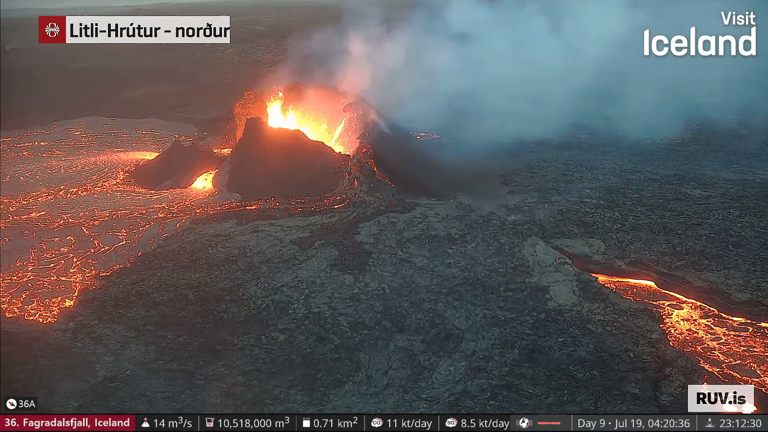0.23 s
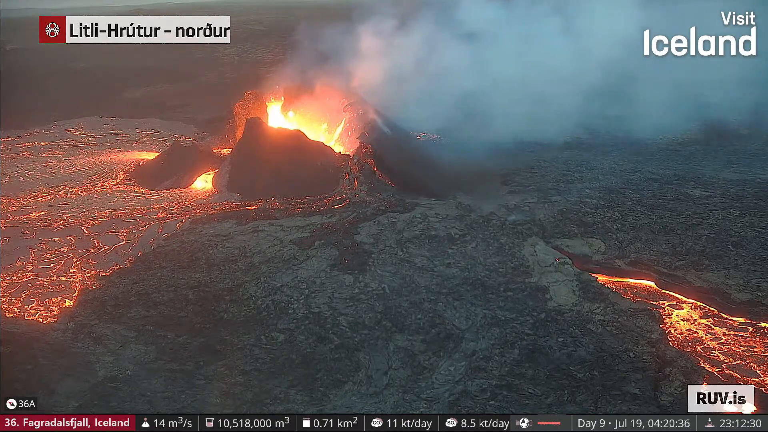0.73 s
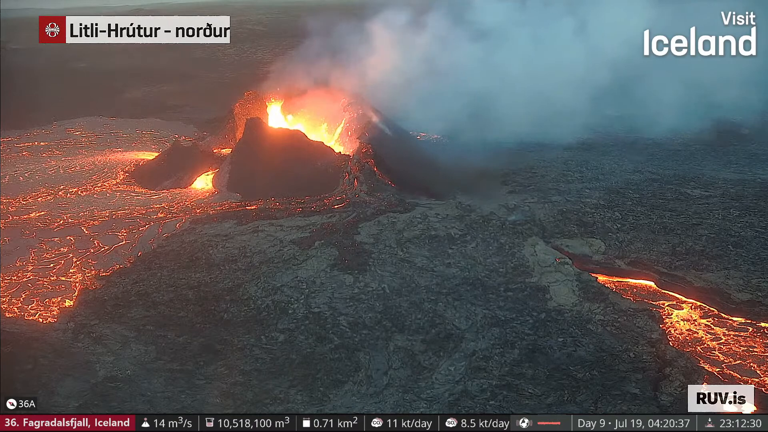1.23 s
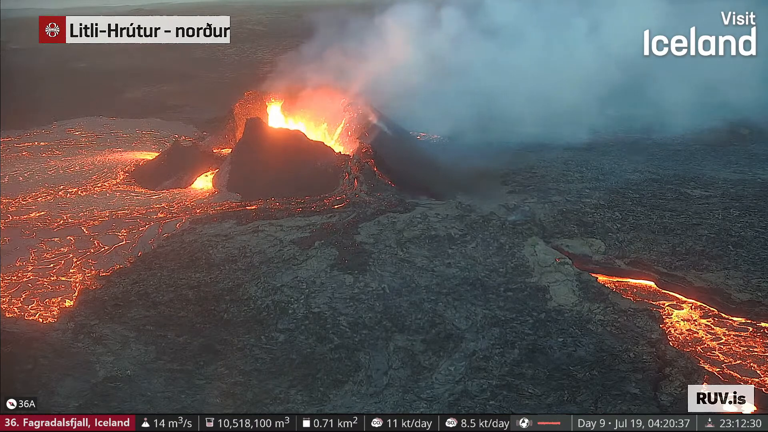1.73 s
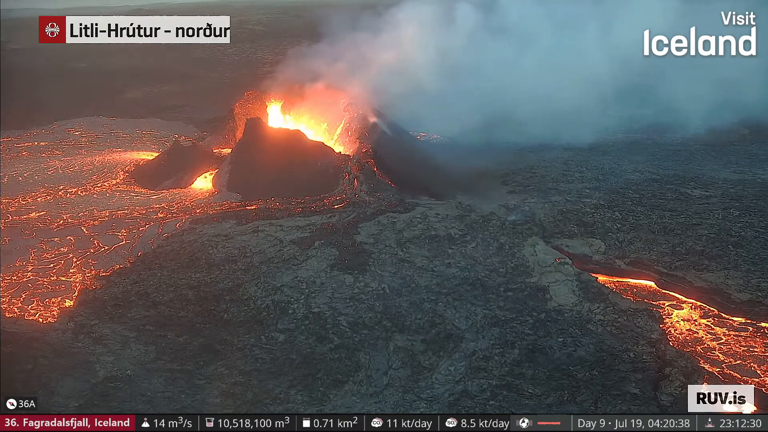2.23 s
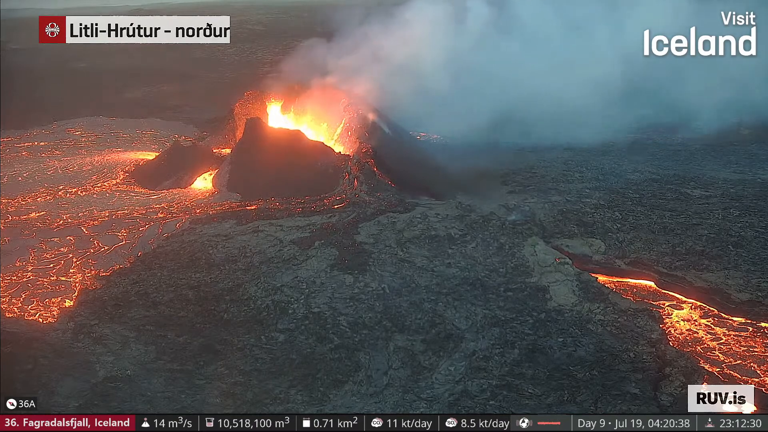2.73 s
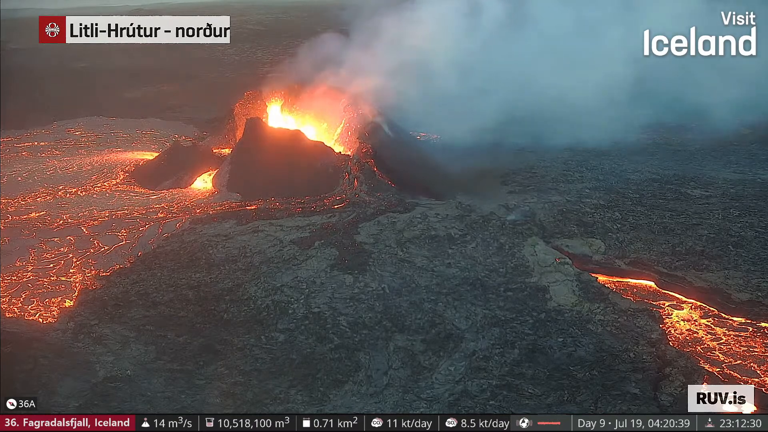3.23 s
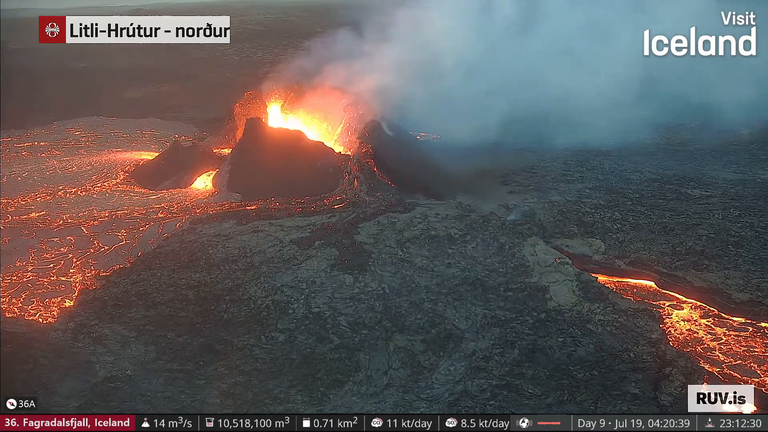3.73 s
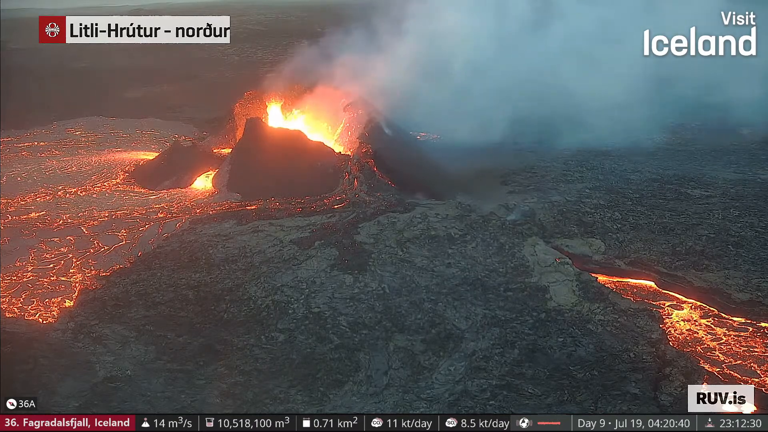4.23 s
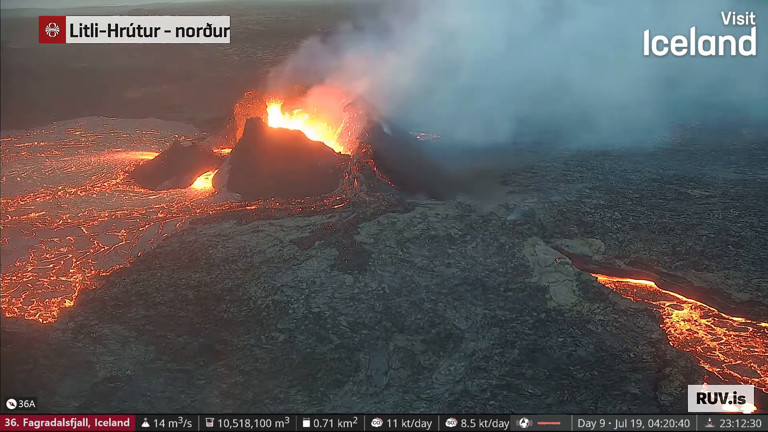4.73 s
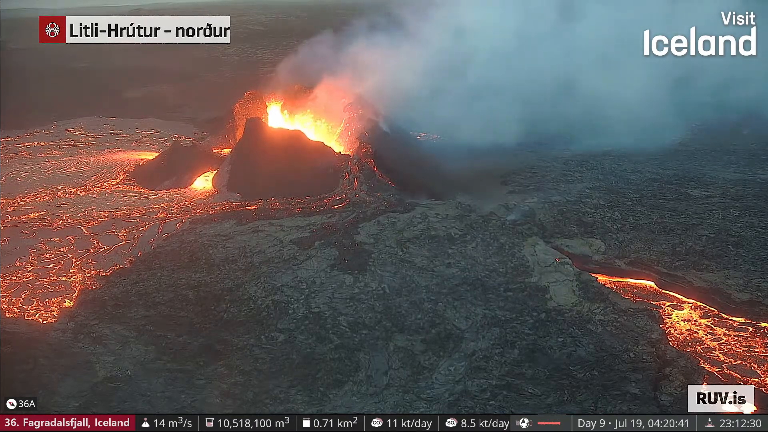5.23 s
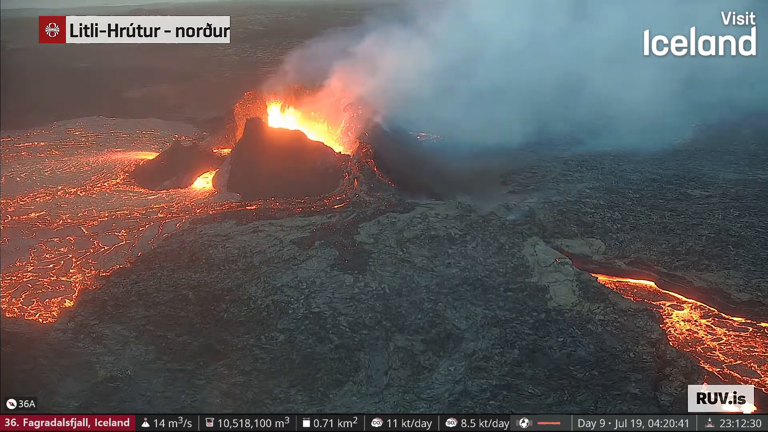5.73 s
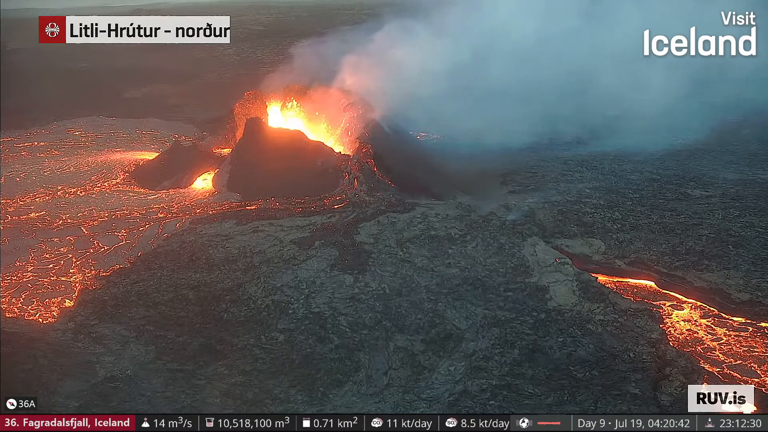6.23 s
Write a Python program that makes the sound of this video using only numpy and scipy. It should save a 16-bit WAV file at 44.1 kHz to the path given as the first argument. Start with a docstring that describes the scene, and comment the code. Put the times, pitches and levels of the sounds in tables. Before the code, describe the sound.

From 0 to about 6.5 seconds, wind blows steadily over an outdoor microphone on an open ridge above an erupting vent. Dense low rumble and soft thumps dominate, heaving quickly, with brief slackening near 1.5, 3.9, 5 and 5.9 seconds. Through it runs a rough, low howl, a blurred humming moan whose pitch constantly wavers; it swells around 0.5 to 1 second, again from 2.6 to 3.3, and more gently near 4, 5.2 and the end. Hollow drones flutter just above it, with quick knocks of wind around 3.8 and 4.5 to 4.7. Far quieter behind, lava makes a dull, churning roar with a thin rasp, surging near 0.2, 0.7, 1.7, 3.5, 4.5 and 5.4, with soft puffs clustered around 2.1. Tiny gritty ticks and faint hiss are almost buried. The sound is dark, continuous and bass-heavy.

```python
"""A ridge above an erupting volcanic vent, where wind buffets an outdoor camera.
Eddies shed by the mast make a rough, low howl: a wavering line, a noisy skirt, an octave and a slower beat.
Low noise thumps the microphone, and two resonant noise bands drone round the housing.
Behind, filtered noise makes a dull roar that surges, sinks and puffs, faint gritty ticks and a thin hiss."""
import sys
import numpy as np
from scipy import signal
from scipy.fft import rfft, irfft, next_fast_len
from scipy.io import wavfile
from scipy.ndimage import uniform_filter1d, minimum_filter1d, map_coordinates

SR = 44100
rng = np.random.default_rng(int(sys.argv[2]) if len(sys.argv) > 2 else 0)


def store_pcm(level_fs):
    """Save levels as 16-bit WAV."""
    pcm = np.round(np.clip(level_fs, -1, 1) * 32767).astype(np.int16)
    wavfile.write(sys.argv[1], SR, np.atleast_2d(pcm).T)


N = 285591

# Noise colours. Each row: frequency in Hz, relative spectral density in dB.
HISS_COLOUR = [(1200, -17.5), (3000, -5), (4100, 5), (5200, -2), (7500, -1), (9000, 2), (10300, 2),
               (11300, -3), (14000, -7.5)]
GRIT_COLOUR = [(1500, -26.5), (2000, 0), (2350, 5.5), (2700, -6.5), (3200, -16.5), (3900, -3), (4300, 1),
               (5100, -10.5), (6500, -17), (10000, -33)]
SCUFF_COLOUR = [(500, -15.5), (1200, 9.5), (2300, -4.5), (3300, -24.5), (8000, -52.5)]
SPARK_COLOUR = [(3500, -27.5), (5600, -2.5), (10000, -1), (14000, -14)]
PUFF_COLOUR = [(200, -14.5), (450, 10), (700, 7.5), (1000, -11.5), (1700, -23), (3000, -40), (8000, -74.5)]
SPLASH_COLOUR = [(500, -6.5), (950, 10), (1500, -6.5), (2200, -18), (3200, -25), (8000, -50.5)]
ROAR_COLOUR = [(250, -16.5), (600, 4.5), (800, -2), (1050, -6), (1500, -17), (1900, -22), (3000, -43),
               (6000, -78)]
RASP_COLOUR = [(700, -15), (1100, 3.5), (1500, 5.5), (1900, -1.5), (2350, -2), (3000, -9), (4200, -14.5),
               (5200, -16.5), (9000, -29)]
BUFFET_COLOUR = [(3, -21.5), (10, -1), (40, -1), (70, -3), (120, -3.5), (190, -7.5), (260, -19.5),
                 (500, -49), (1000, -100)]
LOW_HOUSING_COLOUR = [(120, -25.5), (205, 4), (250, 0), (295, -1.5), (340, -10.5), (450, -28.5), (900, -71)]
HIGH_HOUSING_COLOUR = [(200, -25.5), (300, -1.5), (360, 1), (465, -4), (550, -13.5), (750, -26.5),
                       (1200, -42), (3000, -100)]

# Swells of the hiss. Each row: centre in seconds, length in seconds, lift in dB.
HISS_SWELLS = [(0.62, 0.37, 4), (1.2, .4, 2), (4.05, 0.99, 1), (6.14, 0.2, 2.5)]
HISS_DB = -71  # before the swells

# Gritty ticks. Each row: start in seconds, rise in seconds, then grit, dull scuff and bright spark in dB.
TICKS = [(0.174, 0.0055, -65, -57, -74.5), (0.872, .007, -64, -55.5, -71), (1.119, 0.0035, -62.5, -53, -69),
         (1.326, .006, -69, -50.5, -73), (1.5413, 0.0015, -58.5, -55, -67.5),
         (1.921, 0.0025, -61, -66, -76), (3.046, 0.0035, -61, -70, -77.5), (3.0556, .005, -60, -70, -66),
         (5.125, .004, -64.5, -53.5, -70), (5.4144, .005, -67, -58, -70.5),
         (5.6828, 0.0024, -57.5, -53.5, -63)]

# Puffs in the roar. Each row: start in seconds, rise in seconds, body in dB, splash in dB.
PUFFS = [(0.165, 0.0083, -49, -50), (0.236, 0.0036, -37.5, -59), (0.648, 0.0072, -39.5, -56.5),
         (0.754, 0.0035, -39, -63), (0.946, 0.0046, -59, -55), (1.116, .007, -49, -46),
         (1.35, 0.0071, -47, -50), (1.699, 0.0037, -42, -57), (1.731, 0.0074, -42, -58.5),
         (1.903, 0.0047, -46, -60), (1.962, 0.0099, -44, -60), (2.081, 0.003, -37, -58),
         (2.205, 0.0097, -36, -53.5), (2.904, 0.006, -39.5, -59.5), (3.491, 0.0037, -40.5, -56),
         (3.764, 0.0099, -44, -65), (4.426, 0.0069, -46, -50.5), (4.552, 0.0046, -41, -63),
         (4.676, 0.0054, -42.5, -62), (5.375, 0.0076, -39, -49.5), (5.458, .004, -42, -59),
         (5.715, 0.0049, -47, -62), (5.866, .004, -46, -63.5)]

# Surges of the lava fountain. Each row: crest in seconds, roar in dB, rasp in dB, fall in dB per second.
SURGES = [(0.18, -51, -62.5, 19), (0.66, -52, -70, 10.5), (0.9, -56, -65.5, 13), (1.74, -51.5, -76.5, 6),
          (3.46, -52, -65.5, 8.5), (3.76, -53, -65.5, 36.5), (4.48, -56.5, -63, 8), (4.72, -55, -76, 11),
          (5.36, -55.5, -63, 11)]
SURGE_RISE_S = 0.11
# The vent between surges: starting levels, and how fast both ebb.
ROAR_DB, RASP_DB, EBB_DB_PER_S = -50.5, -60, 1

# Lulls and pushes in the buffeting. Each row: centre in seconds, length in seconds, change in dB.
BUFFET_CHANGES = [(0.45, 0.19, 1.5), (0.75, 0.14, -1.5), (1.04, 0.095, -2.5), (1.5, 0.066, -6),
                  (1.66, .1, -1), (1.96, 0.055, 1), (2.68, 0.12, -2), (2.95, 0.2, 1), (3.3, 0.14, -2.5),
                  (3.92, 0.17, -3.5), (4.54, 0.095, 0), (4.96, 0.19, -6.5), (5.33, .2, -0.5),
                  (5.65, 0.12, -0.5), (5.93, 0.26, -4.5), (6.35, 0.24, -0.5)]
# Usual buffeting level, rms depth of its random heaving, and random turning points per second.
BUFFET_DB, HEAVE_DB, HEAVE_RATE = -23, 0.53, 14

# Housing drone. Each row: time in seconds, lower resonance in dB, upper resonance in dB.
DRONE = [(0.0, -35.5, -35.5), (0.2, -31.5, -35), (0.55, -28, -35), (0.8, -36.5, -33.5), (1.08, -33.5, -31),
         (1.2, -35.5, -37.5), (1.48, -34, -40), (1.95, -37, -38), (2.38, -35.5, -41), (2.55, -34, -35.5),
         (3.1, -33, -35), (3.45, -30, -35.5), (3.8, -33, -36.5), (4.3, -38.5, -35), (4.7, -34.5, -39),
         (5.0, -38.5, -38), (5.2, -40.5, -37), (5.32, -37.5, -35), (5.75, -37, -33), (5.98, -35.5, -36.5),
         (6.2, -36.5, -35), (6.48, -30.5, -33.5)]
# Wind turning round the housing. Each row: time in seconds, upper resonance shift in semitones.
VEER = [(0.0, 0), (0.65, 0.83), (0.95, -1), (1.3, .5), (1.95, 2), (2.5, 1.6), (2.85, 0.14), (3.25, -1),
        (3.7, 0.47), (4.0, -2), (4.25, -2), (4.65, 1), (5.1, -0.5), (5.7, 0.55), (6.0, -1), (6.48, -1.34)]
# Brief eddies that strike the housing. Each row: centre in seconds, length in seconds, drone lift in dB.
EDDIES = [(0.18, 0.081, 4), (0.5, 0.061, 1.5), (3.5, 0.05, 1.5), (3.76, 0.048, 5), (3.89, 0.042, 3.5),
          (4.09, 0.046, 3.5), (4.46, 0.074, 6), (4.7, 0.043, 5), (5.32, 0.05, 4)]

# Eddies shed by the mast, in step with the wind speed. Each row: time in seconds, shedding rate in Hz.
SHEDDING = [(0.0, 154.7), (0.1, 119.3), (0.2, 176.2), (0.4, 155.2), (0.55, 180.6), (0.62, 170.4),
            (0.69, 204.1), (0.8, 188), (0.92, 195.7), (1.02, 193.6), (1.1, 184.3), (1.24, 181.1),
            (1.45, 168), (1.63, 152), (1.73, 191.2), (1.85, 141.8), (1.89, 186), (1.98, 192.4), (2.09, 109),
            (2.31, 160), (2.41, 135), (2.61, 176.4), (2.74, 185), (2.8, 168), (2.88, 180), (3.17, 171.4),
            (3.3, 156), (3.48, 157.4), (3.72, 180), (3.87, 141), (3.99, 181.9), (4.08, 151), (4.2, 173.9),
            (4.3, 145.9), (4.42, 137.9), (4.53, 197.5), (4.6, 167.9), (4.75, 184.4), (4.86, 169.9),
            (4.98, 183.8), (5.08, 160.8), (5.12, 128.2), (5.17, 150), (5.24, 144), (5.37, 182),
            (5.47, 187.6), (5.57, 167), (5.66, 188), (5.75, 165), (5.95, 164), (6.05, 170), (6.35, 139),
            (6.48, 166.8)]
# Gusts in the howl. Each row: centre in seconds, length in seconds, lift (or dip) in dB.
GUSTS = [(0.77, 0.8, 9.5), (1.55, 0.11, 1.5), (1.83, 0.16, 4), (2.12, .14, -2), (2.6, 0.18, 7.5),
         (2.79, 0.25, 8.5), (3.27, 0.3, 9), (4.03, 0.51, 2.5), (5.25, 0.39, 3.5), (6.22, 2.1, 4.5)]
# Howl between gusts: complex level at the mean rate (its real part lies 3 dB lower), and rise with rate.
HOWL_DB, HOWL_DB_PER_OCTAVE = -26.5, 3.5
# Smeared octave: level against the howl, and random wander in knots per second.
OCTAVE_DB, OCTAVE_WANDER_RATE = -23.5, 55
# Thicker part of the mast: rate over the main one, level against the howl, wander in knots per second.
SLOW_RATIO, SLOW_DB, SLOW_WANDER_RATE = 0.77, -11.5, 30

TOP_HZ = 14300  # the camera's band limit


def amp(db):
    """Decibels to gain."""
    return 10 ** (np.asarray(db) / 20)


def unit(x):
    """Scale to rms 1."""
    return x / np.sqrt(np.mean(np.abs(x) ** 2) + 1e-20)


def curves(rows):
    """Draw straight lines between rows: one curve for each column after the time."""
    times, *columns = np.transpose(rows)
    t = np.arange(N) / SR
    return [np.interp(t, times, column) for column in columns]


def wobble(rate):
    """A smooth random curve of rms 1, with rate knots a second."""
    knots = rng.standard_normal(int(N * rate / SR) + 4)
    return unit(map_coordinates(knots, [np.arange(N) * rate / SR]))


def scatter(rate):
    """A random wander of size and phase, rms 1, that smears a line; rate is in knots a second."""
    return unit(wobble(rate) + 1j * wobble(rate))


def swells(rows):
    """Sum bell-shaped rises or dips in dB; length spans the points where the bell falls to 1/e."""
    t = np.arange(N) / SR
    return sum(db * np.exp(-(2 * (t - centre) / length) ** 2) for centre, length, db in rows)


def burst(start, rise):
    """A soft-edged envelope that peaks at 1, rise seconds after its start."""
    u = np.maximum(np.arange(N) / SR - start, 0) / rise
    return u * np.exp(1 - u)


def filtered(x, response):
    """Shape a sound's spectrum by a gain for each frequency."""
    m = next_fast_len(N + SR // 2)  # padding keeps the filter's tail from wrapping round
    hz = np.fft.rfftfreq(m, 1 / SR)
    return irfft(rfft(x, m) * response(hz), m)[:N]


def noise(colour):
    """Random noise of rms 1, coloured along a log-frequency curve."""
    f, db = np.transpose(colour)

    def response(hz):
        return amp(np.interp(np.log(hz + 1), np.log(f), db))

    return unit(filtered(rng.standard_normal(N), response))


def steady(x, seconds):
    """Even out the slow swells of a sound and keep its fast flutter."""
    power = uniform_filter1d(np.abs(x) ** 2, max(int(seconds * SR), 1))
    return x / np.sqrt(np.abs(power) + 1e-12)


def patchy(x, depth_db):
    """Lift and drop neighbouring bands of a noise at random."""
    z = signal.stft(x, nperseg=1024)[2]
    field = rng.standard_normal(z.shape)
    field = uniform_filter1d(field, size=4, axis=0)  # blend across frequency
    field = uniform_filter1d(field, size=5, axis=1)  # blend across time
    lifted = z * amp(depth_db * unit(field))
    return unit(signal.istft(lifted, nperseg=1024)[1][:N])


def shifted(x, semitones):
    """Slide all the frequencies of a noise by reading it at a varying speed."""
    position = np.cumsum(2 ** (semitones / 12))
    return map_coordinates(x, [position], mode="mirror")


def surging(rest_db, surges):
    """Add the power of fast-rising, slow-sinking surges to a slowly ebbing bed, and give the gain."""
    t = np.arange(N) / SR
    power = amp(rest_db - EBB_DB_PER_S * t) ** 2
    for crest, db, fall in surges:
        rise = np.exp(-(np.minimum(t - crest, 0) / SURGE_RISE_S) ** 2)
        sink = amp(db - fall * np.maximum(t - crest, 0))
        power = power + (rise * sink) ** 2
    return np.sqrt(power)


def hiss():
    """A thin hiss, gently uneven noise, lies far under the rumble."""
    air = patchy(noise(HISS_COLOUR), depth_db=1.8)
    level_db = HISS_DB + swells(HISS_SWELLS) + 0.87 * wobble(22)
    return amp(level_db) * air


def ticks():
    """Each tick is a short, grainy spray of noise with its own mix of grit, dull scuff and bright spark."""
    grit = sum(amp(db) * burst(s, rise) for s, rise, db, _, _ in TICKS)
    scuff = sum(amp(db) * burst(s, rise) for s, rise, _, db, _ in TICKS)
    spark = sum(amp(db) * burst(s, rise) for s, rise, _, _, db in TICKS)
    grains = steady(amp(4 * wobble(1000)), seconds=0.004)
    return grains * (grit * noise(GRIT_COLOUR) + scuff * noise(SCUFF_COLOUR) + spark * noise(SPARK_COLOUR))


def puffs():
    """Short bursts in the vent's roar: a dull body of noise with more or less splash on top."""
    body = sum(amp(db) * burst(s, rise) for s, rise, db, _ in PUFFS)
    splash = sum(amp(db) * burst(s, rise) for s, rise, _, db in PUFFS)
    dull = steady(noise(PUFF_COLOUR), seconds=0.0036)
    wet = steady(noise(SPLASH_COLOUR), seconds=0.014)
    return body * dull + splash * wet


def roar():
    """The vent's turbulent roar surges and churns quickly; a thinner rasp rides above it."""
    roar_gain = surging(ROAR_DB, [(s, db, fall) for s, db, _, fall in SURGES])
    rasp_gain = surging(RASP_DB, [(s, db, fall) for s, _, db, fall in SURGES])
    churn = amp(1.1 * wobble(23) + 1.2 * wobble(110))
    bed = steady(churn * patchy(noise(ROAR_COLOUR), depth_db=1.25), seconds=0.21)
    rasp_churn = amp(1.1 * wobble(25) + 1.4 * wobble(140))
    rasp = unit(rasp_churn * noise(RASP_COLOUR))
    return roar_gain * bed + rasp_gain * rasp


def buffeting():
    """Pressure lumps hit the microphone as low, heaving noise."""
    level_db = BUFFET_DB + HEAVE_DB * wobble(HEAVE_RATE) + swells(BUFFET_CHANGES)
    return amp(level_db) * steady(noise(BUFFET_COLOUR), seconds=0.1)


def housing_drone():
    """The flow drones round the housing in two fluttering resonances; the upper slides as the wind turns."""
    low_db, high_db = curves(DRONE)
    semitones, = curves(VEER)
    flutter = amp(1.15 * wobble(45))
    low = patchy(noise(LOW_HOUSING_COLOUR), depth_db=-0.1)
    high = shifted(patchy(noise(HIGH_HOUSING_COLOUR), depth_db=1.5), semitones)
    low_drone = amp(low_db) * steady(flutter * low, seconds=0.18)
    high_drone = amp(high_db) * steady(flutter * high, seconds=0.11)
    return amp(swells(EDDIES)) * (low_drone + high_drone)


def mast_howl(tone_db, skirt_db, skirt_rate, jitter, shimmer_db, tone_tilt):
    """Eddies leave the mast almost regularly: a jittery line within a noisy skirt.

    Their drag adds an octave, and slower eddies beat against them.
    """
    rate, = curves(SHEDDING)
    rate_octaves = np.log2(rate / np.mean(rate))
    level_db = HOWL_DB + HOWL_DB_PER_OCTAVE * rate_octaves + swells(GUSTS)
    phase = 2 * np.pi * np.cumsum(rate * (1 + jitter * wobble(35))) / SR
    tilt_db = tone_tilt * (level_db - np.mean(level_db))  # a fraction of a dB
    tone = amp(tone_db + tilt_db) * unit(amp(shimmer_db * wobble(45)))
    skirt = amp(skirt_db) * scatter(skirt_rate)  # turbulence scatters the eddies
    eddies = steady(tone + skirt, seconds=0.081) * np.exp(1j * phase)
    octave = amp(OCTAVE_DB) * scatter(OCTAVE_WANDER_RATE) * np.exp(2j * phase)
    slow = amp(SLOW_DB) * scatter(SLOW_WANDER_RATE) * np.exp(1j * SLOW_RATIO * phase)
    return amp(level_db) * np.real(eddies + octave + slow)


def scene():
    """All sources meet at one microphone."""
    vent = hiss() + ticks() + puffs() + roar()
    wind = buffeting() + housing_drone()
    howl = mast_howl(tone_db=3, skirt_db=1, skirt_rate=61.94, jitter=0.03, shimmer_db=0.6, tone_tilt=0.027)
    return (vent + wind + howl)[None]


def limiter(x, ceiling_db, hold, knee):
    """Ease the gain down around the tallest peaks, starting gently below the ceiling; hold in seconds."""
    span = max(int(hold * SR), 1)
    needed = (1 + np.abs(x / amp(ceiling_db)) ** knee) ** (-1 / knee)
    gain = minimum_filter1d(needed, 2 * span)
    smooth_gain = uniform_filter1d(uniform_filter1d(gain, span), span)
    return x * smooth_gain


def record(dry):
    """The camera holds its peaks down and keeps nothing above its band limit; the sound fades in and out very
    briefly at both ends."""
    held = limiter(dry[0], ceiling_db=-9.8, hold=0.008, knee=6)
    soft_ends = signal.windows.tukey(N, 0.001)
    return filtered(held * soft_ends, lambda hz: hz < TOP_HZ)[None]


dry = scene()
out = record(dry)
store_pcm(out)
```